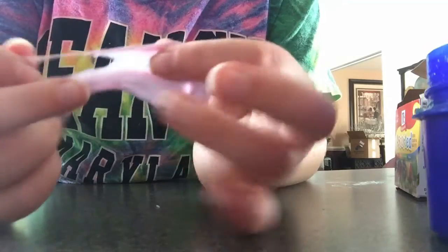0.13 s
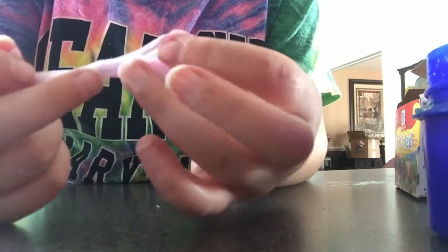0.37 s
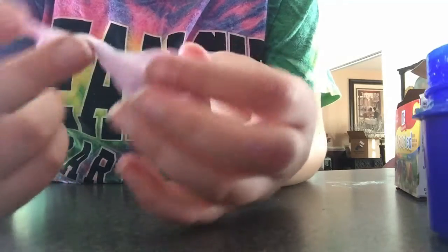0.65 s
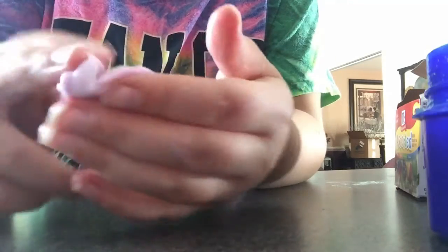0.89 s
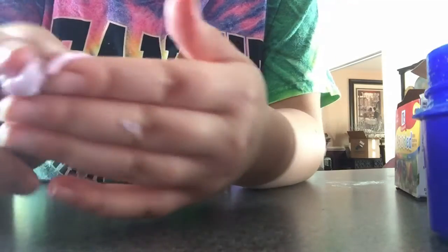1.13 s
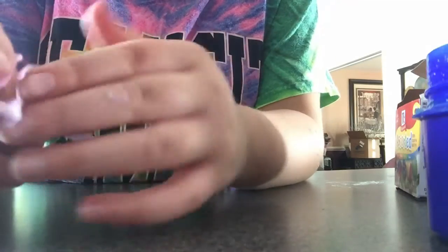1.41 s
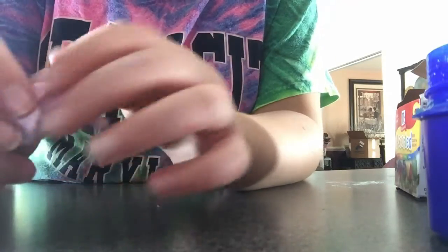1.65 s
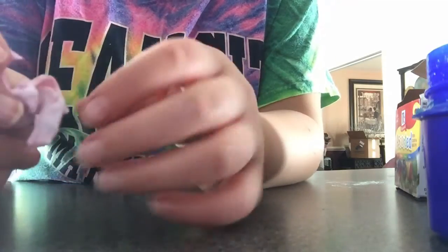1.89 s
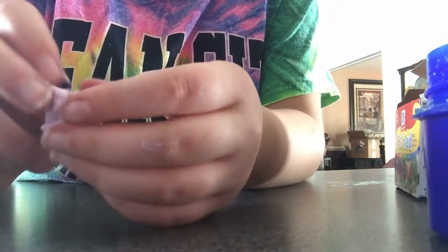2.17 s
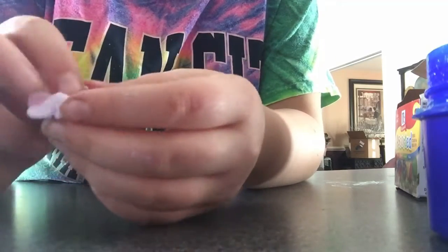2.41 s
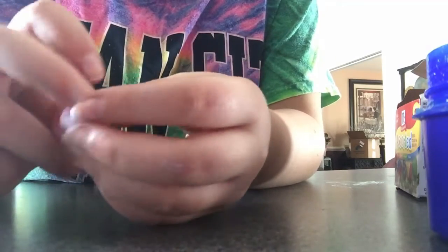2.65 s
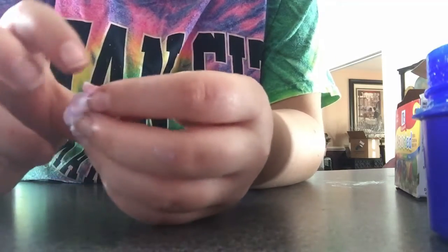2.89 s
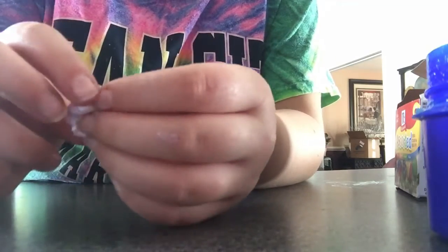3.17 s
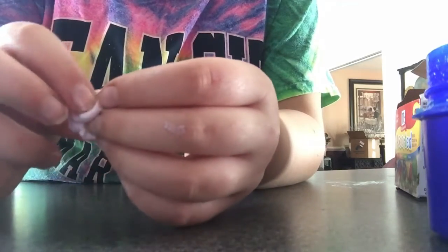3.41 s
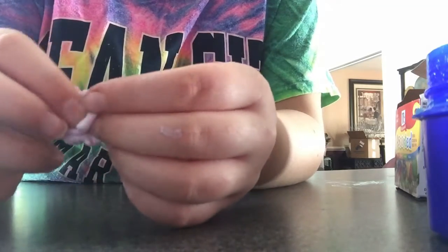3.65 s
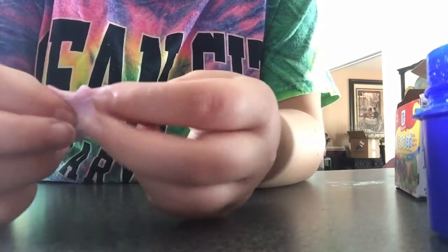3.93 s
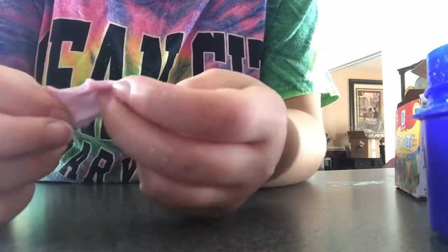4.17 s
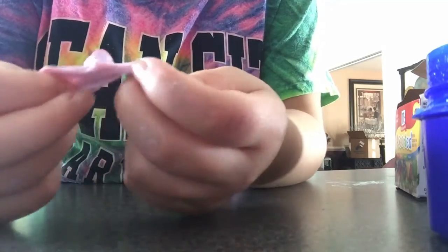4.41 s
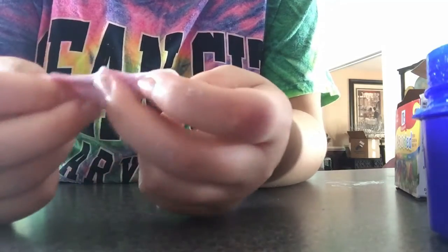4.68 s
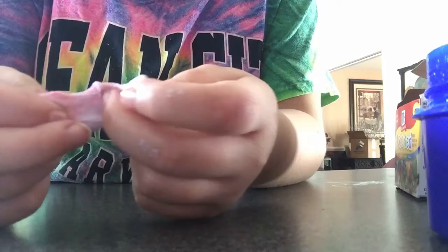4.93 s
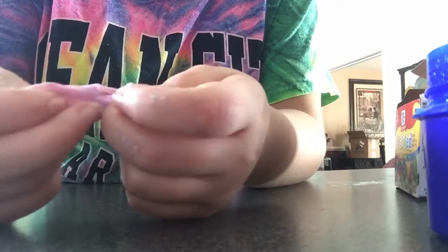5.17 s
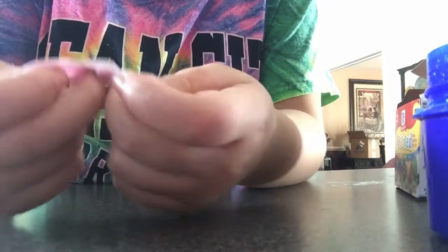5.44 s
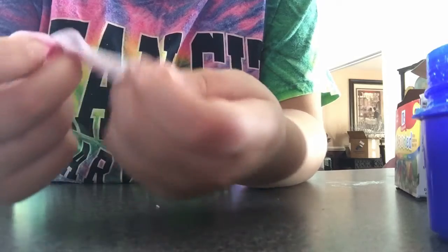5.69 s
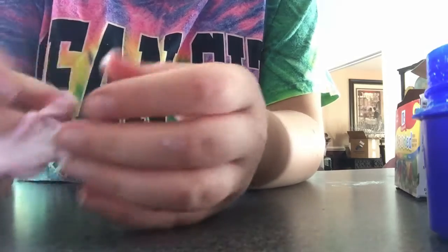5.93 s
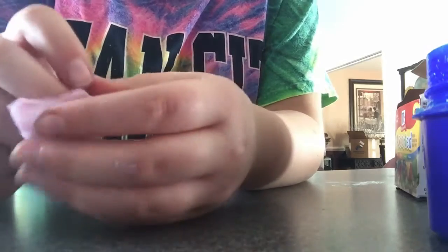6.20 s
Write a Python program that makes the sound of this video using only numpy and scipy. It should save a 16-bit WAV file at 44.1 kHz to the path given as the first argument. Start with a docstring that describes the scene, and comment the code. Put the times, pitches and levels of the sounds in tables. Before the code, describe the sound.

Close to a phone microphone in a kitchen, a bare forearm drags over the counter with a loud, grainy hiss, ending in a sharp skin slap and dull wrist knock. Then it goes quiet: fingers knead sticky slime with faint crackle, small wet smacks and high ticks. A softer slide with light bumps comes midway, then more sticky clicks and squishes over a low room hum.

```python
"""On a kitchen counter, with the phone's microphone just beyond a blob of sticky slime, the room hums low throughout.
A bare forearm slides on the counter with a broad hiss, near 1.6 s skin slaps and the wrist bumps the slab;
then kneading fingers draw faint crackle, ticks and smacks, the arm slides again from 4.2 s, and more wet contacts follow.
Grainy noise makes the slides and crackle, ringing modes the bumps, snaps, rings and fizz the smacks and ticks;
the phone's noise suppressor darkens the treble whenever little goes on."""
import sys
import numpy as np
from scipy import signal
from scipy.fft import rfft, irfft, next_fast_len
from scipy.io import wavfile
from scipy.ndimage import uniform_filter1d, map_coordinates

SR = 44100
rng = np.random.default_rng(int(sys.argv[2]) if len(sys.argv) > 2 else 0)


def attenuation_scalar(level_db):
    """Turn a level in dB into a linear amplitude multiplier (20 dB per decade)."""
    decades = np.asarray(level_db, float) / 20
    return 10 ** decades


def master_out(mix):
    """Clip the mix to full scale and print it as 16-bit PCM to the path in sys.argv[1]."""
    frames = np.transpose(np.atleast_2d(mix))
    ceiling = np.clip(frames, -1, 1)
    pcm = np.round(ceiling * 32767).astype(np.int16)
    wavfile.write(sys.argv[1], SR, pcm)


N = 278660  # samples

# forearm sliding on the counter, one curve a stroke: (time [s], level [dB])
SLIDE_STROKES = [
    [(0.0, -34.5), (0.05, -36), (0.13, -43.5), (0.39, -40), (0.51, -49.5)],
    [(0.51, -50), (0.55, -34), (0.6, -32), (0.84, -34.5), (0.92, -39), (1.03, -33), (1.18, -37),
     (1.22, -33.5), (1.57, -39), (1.64, -29.5), (1.68, -36.5), (1.86, -37.5), (2.03, -43.5), (2.17, -67.5)],
    [(4.22, -64.5), (4.364, -50.5), (4.638, -43), (4.776, -49), (4.828, -39), (4.998, -51.5), (5.17, -54.5),
     (5.214, -64.5), (5.3, -64)],
]
# colour of the skin's hiss in the air: (frequency [Hz], level per Hz [dB])
SKIN_COLOUR = [(530, -41), (900, -22), (1090, -10), (1420, 0.5), (1620, -4.5), (1780, -2), (2230, -5.5),
               (2480, -8.5), (3810, -4), (5140, -6), (5590, -9.5), (8280, -6.5), (10300, -12.5),
               (12100, -9.5), (15600, -13.5)]
# colour of the rumble through the slab: (frequency [Hz], level per Hz [dB])
SLAB_COLOUR = [(65, -55.5), (110, -18.5), (150, -8), (242, -2.5), (305, -5), (367, -3), (436, -5.5),
               (519, -4.5), (600, 1), (741, -8), (1100, -12.5), (1430, -27.5), (2420, -120)]
# how hard the arm leans, one value a stroke: (rumble over hiss [dB])
STROKE_LEAN = [-9.5, -7.5, -7]
# colour of the room noise: (frequency [Hz], level per Hz [dB])
ROOM_COLOUR = [(30, -31), (60, -20), (100, -21.5), (180, -15.5), (270, -14.5), (420, -23), (700, -25.5),
               (800, -34.5), (1400, -35), (2000, -43.5), (3000, -53.5), (13300, -58.5), (14000, -63),
               (20000, -74)]
# level of the upper room noise as the phone's suppressor adapts: (time [s], level [dB])
UPPER_ROOM_LEVEL = [(2.1, -60.5), (2.92, -63.5), (3.13, -60.5), (4.05, -67), (4.27, -62), (5.4, -62.5),
                    (6.08, -62), (6.32, -67)]
# narrow drone of an appliance: (frequency [Hz], width [Hz], level [dB])
APPLIANCE_DRONE = (286, 52, -59)
# wet smacks, and the slap of skin, low: (time [s], level [dB], centre [Hz], length [s], relative snap level [dB])
SMACK_CONTACTS = [(1.627, -27.5, 1295, 0.013, 1.5), (1.654, -30.5, 1500, 0.0092, -17),
                  (2.622, -50, 2180, 0.037, -8), (2.6355, -48.5, 1520, 0.034, -10),
                  (2.6876, -46, 2050, 0.029, -7), (2.712, -58.5, 3900, 0.09, -8.5),
                  (2.912, -56, 3470, 0.025, -1), (2.965, -41.5, 1210, 0.028, -7.5),
                  (2.9776, -41, 750, 0.033, -2), (3.03, -38, 1340, .028, -5),
                  (3.052, -40.5, 1140, .035, 2.5), (3.1, -59, 3800, .02, -8),
                  (3.312, -51.5, 1580, .015, -2.5), (3.635, -53, 2820, 0.038, -3),
                  (3.75, -62.5, 3170, 0.038, -5.5), (5.7856, -55, 1920, 0.026, -8),
                  (5.816, -52.5, 1710, 0.041, -10), (5.936, -58, 2860, 0.012, -4),
                  (6.003, -54, 2060, 0.063, -13.5), (6.046, -53, 3290, 0.018, -18),
                  (6.085, -52.5, 2090, 0.0098, -3.5)]
# wrist bumps on the counter: (time [s], level [dB], length of the push [s])
WRIST_BUMPS = [(1.635, -16.5, 0.0028), (1.644, -18.5, 0.0073), (1.659, -27, 0.0023), (1.671, -24.5, 0.0023),
               (4.461, -42, 0.0031), (4.821, -42, 0.0034), (5.837, -37.5, 0.006), (5.855, -35.5, 0.00096),
               (5.941, -36.5, 0.0018)]
# ringing modes of the counter slab: (frequency [Hz], relative level [dB], t60 [s])
COUNTER_MODES = [(138, -12, .15), (204, 0.5, 0.075), (252, -2.5, 0.088), (302.3, -1.5, 0.11),
                 (337, -11, 0.17), (498, -11.5, 0.062), (608, -6.5, 0.085), (672, 1, 0.027),
                 (1340, -11.5, 0.031)]
# each squeeze starts a faint crackle that fades: (time [s], level [dB], fade [dB/s])
SLIME_SQUEEZES = [(2.1, -55, 79), (2.2, -56.5, 27), (2.264, -57.5, 67), (2.354, -59, 97), (2.42, -63, 89),
                  (2.61, -65.5, 98), (2.696, -71, 113), (3.29, -63.5, 120), (5.17, -62.5, 13),
                  (5.348, -56.5, 250), (5.421, -57.5, 95), (5.576, -59.5, 73), (5.67, -64.5, 50),
                  (5.838, -58.5, 30), (5.94, -61, 70), (6.06, -59.5, 150), (6.2, -69.5, 50)]
# colour of the crackle: (frequency [Hz], level per Hz [dB])
CRACKLE_COLOUR = [(1350, -5), (2300, -5), (2570, -12), (3540, -8), (6260, -13.5), (7890, -11), (10400, -13),
                  (12400, -16), (15600, -16)]
# sticky threads letting go, high: (time [s], level [dB], centre [Hz], width [octaves], relative snap level [dB])
THREAD_TICKS = [(2.197, -54, 8800, 0.8, -5), (2.23, -62, 4600, .5, -8), (2.27, -55, 9050, .6, -6),
                (2.345, -56.5, 3630, 0.58, -6.5), (2.418, -52.5, 8200, 0.92, -2),
                (2.605, -54.5, 5140, 0.98, -6), (2.646, -55, 9100, 0.62, -6.5),
                (3.114, -56, 8430, 0.19, -8.5), (3.18, -64, 8000, .25, -9), (3.26, -54.5, 8760, 0.28, -7),
                (3.289, -50.5, 9450, 0.89, -4), (3.312, -51.5, 5520, 0.54, 4), (3.334, -51, 8400, .9, -5),
                (3.439, -68.5, 8500, .2, -6), (3.578, -61.5, 7900, 0.19, -9),
                (3.645, -62, 9360, 0.26, -2.5), (4.223, -62, 12200, 0.61, 1), (5.25, -64, 4000, 0.55, -8),
                (5.33, -52.5, 8260, 1.1, -4), (5.423, -60.5, 7450, 0.28, 4), (5.458, -52, 12200, 0.51, -7),
                (5.509, -58, 5530, 0.63, -6), (5.579, -52.5, 9500, 1.6, -4), (5.623, -61, 11000, 0.75, 10),
                (5.67, -58, 3800, .6, -8), (5.70, -53.5, 6530, 1.33, -10), (5.728, -59, 3800, 0.51, -3),
                (5.831, -57, 5250, 0.9, -7), (5.881, -55.5, 12500, 0.72, 2), (5.939, -49, 7050, 2.4, 2),
                (5.998, -58, 7900, 1.5, -5), (6.087, -57.5, 6200, 0.72, 3), (6.204, -60, 5540, 1.3, -4),
                (6.287, -60.5, 9000, 1.6, -3)]
# decay of the kitchen's answer: (frequency [Hz], t60 [s])
KITCHEN_DECAY = [(200, 0.18), (2000, 0.41), (10000, 0.076)]
# level under which the suppressor takes sound for noise: (frequency [Hz], level per Hz [dB])
NOISE_THRESHOLD = [(1200, -125), (2300, -103), (6000, -105), (15000, -108)]

LOW_CUT_HZ, TOP_HZ = 115, 15740
SMACK_OCTAVES, SMACK_REF_HZ, SMACK_NARROWS = 1.21, 1190, 0.83  # a higher smack fills fewer octaves
TICK_S = 0.038  # length of a tick's fizz
SQUEEZE_RISE_DB_PER_S = 900


def unit(x):
    """x at rms 1."""
    return x / np.sqrt(np.mean(x ** 2) + 1e-20)


def along(points, hz):
    """(frequency [Hz], value) points read on a log frequency axis."""
    f, value = np.transpose(points)
    return np.interp(np.log(hz + 1), np.log(f + 1), value)


def wobble(rate):
    """A smooth random curve, rate knots a second."""
    knots = rng.standard_normal(int(N * rate / SR) + 4)
    return map_coordinates(knots, [np.arange(N) * rate / SR])


def filtered(x, response):
    """x times a response of frequency."""
    m = next_fast_len(len(x) + 8192)
    return irfft(rfft(x, m) * response(np.fft.rfftfreq(m, 1 / SR)), m)[:len(x)]


def gritty(spectrum, grit_db):
    """Dense tiny slips of uneven size, coloured, rms 1."""
    unevenness = np.minimum(rng.exponential(size=N), 5)
    slips = rng.standard_normal(N) * attenuation_scalar(abs(grit_db) * unevenness)
    return unit(filtered(slips, lambda hz: attenuation_scalar(along(spectrum, hz))))


def strokes(tables, over_db):
    """Gain per sample along several strokes, each raised by its own dB, silent between them."""
    t, gain = np.arange(N) / SR, np.zeros(N)
    for rows, extra_db in zip(tables, over_db):
        gain += attenuation_scalar(extra_db + np.interp(t, *np.transpose(rows), -150, -150))
    return uniform_filter1d(gain, size=400)


def forearm():
    """Skin slips over the counter's grain: a hiss in the air and a rumble through the slab."""
    catch = wobble(14)  # the skin catches and lets go unevenly
    hiss_gain = strokes(SLIDE_STROKES, np.zeros(len(SLIDE_STROKES)))
    hiss_gain = hiss_gain * attenuation_scalar(0.48 * catch + 0.49 * wobble(70))
    rumble_gain = strokes(SLIDE_STROKES, STROKE_LEAN)
    rumble_gain = rumble_gain * attenuation_scalar(1.4 * catch + 0.68 * wobble(25))
    hiss = hiss_gain * gritty(SKIN_COLOUR, grit_db=2.0)
    rumble = rumble_gain * gritty(SLAB_COLOUR, grit_db=3.0)
    return hiss + rumble


def room():
    """A low rush, its upper part at a level that follows the phone's suppressor adapting, and a wavering drone."""
    hz, width, drone_db = APPLIANCE_DRONE
    s, level = np.transpose(UPPER_ROOM_LEVEL)
    rush = gritty(ROOM_COLOUR, grit_db=0.0)
    upper = filtered(rush, lambda f: 1 / (1 + (380 / (f + 1)) ** 4))
    lower = attenuation_scalar(-62.5 + 1.2 * wobble(3.0)) * unit(rush - upper)
    upper_gain = attenuation_scalar(np.interp(np.arange(N) / SR, s, level))
    drone = filtered(rng.standard_normal(N), lambda f: 1 / (1 + ((f - hz) / width * 2) ** 2))
    return lower + upper_gain * unit(upper) + attenuation_scalar(drone_db) * unit(drone)


def pops(events, lead, squareness, cycles, ring_db, ragged_db, count):
    """A contact parts: a snap within a short burst of fizz, while air pockets ring briefly."""
    out, t = np.zeros(N + SR), np.arange(SR // 4) / SR - 0.03  # the snap is at t = 0
    after = np.maximum(t, 0)
    for s, db, hz, length, octaves, snap_db in events:
        # air pockets, one a row; later ones are weaker
        late = rng.exponential(size=(count, 1))
        pitch, size = rng.standard_normal((2, count, 1))
        pocket_hz = np.clip(hz * 2 ** (0.6 * octaves * pitch), 200, TOP_HZ)
        u = np.maximum(t - 0.52 * length * late, 0)
        decay = attenuation_scalar(ring_db + 3 * size - 6 * late - 60 * u * pocket_hz / cycles)
        rings = decay * np.sin(2 * np.pi * pocket_hz * u) * (1 - np.exp(-u * pocket_hz / 2))

        snap = attenuation_scalar(snap_db - 60 * after * hz * octaves / 9)  # a wide band rings short
        snap = snap * np.sin(2 * np.pi * hz * after) * (1 - np.exp(-2 * after * hz))

        burst = np.where(t < 0, np.exp(-(t / lead) ** 2), np.exp(-(np.abs(t) / length) ** squareness))
        spits = attenuation_scalar(ragged_db * np.repeat(rng.standard_normal(len(t) // 100 + 1), 100)[:len(t)])
        colour = ragged_db * rng.standard_normal(100)  # every contact has its own uneven colour

        def band(f):
            """A bell in octaves, roughened every 220 Hz."""
            bell = np.exp(-(np.log2((f + 1) / hz) / octaves) ** 2)
            return bell * attenuation_scalar(np.interp(f, np.arange(100) * 220, colour))

        fizz = filtered(rng.standard_normal(len(t)) * burst * spits, band)
        fizz = fizz / np.abs(fizz).max()
        start = round((s + t[0]) * SR)
        out[start:start + len(t)] += attenuation_scalar(db) * (5.3 * snap + 2.4 * rings.sum(0) + 0.98 * fizz)
    return out[:N]


def smacks():
    """Skin slaps and wet slime parts: low wide snaps and short fizz among quickly damped air pockets."""
    events = []
    for s, db, hz, length, snap_db in SMACK_CONTACTS:
        octaves = SMACK_OCTAVES * (SMACK_REF_HZ / hz) ** SMACK_NARROWS
        events.append((s, db, hz, length, octaves, snap_db))
    return pops(events, lead=0.005, squareness=1.5, cycles=18, ring_db=-10, ragged_db=3.5, count=24)


def bumps():
    """Each soft push rings the slab's modes at new strengths."""
    out, t = np.zeros(N + SR), np.arange(SR // 2) / SR
    for s, db, push in WRIST_BUMPS:
        ring = np.zeros(len(t))
        for hz, level, t60 in COUNTER_MODES:
            decay = attenuation_scalar(level + rng.normal(0, 1.0) - 60 * t / t60)
            ring += decay * np.sin(2 * np.pi * hz * t)
        ring = ring * (1 - np.exp(-t / abs(push)))
        out[round(s * SR):][:len(t)] += attenuation_scalar(db) * ring / np.abs(ring).max()
    return out[:N]


def squeezing():
    """Crackle gain: the newest squeeze rises fast and fades until the next takes over."""
    s, db, fade = np.transpose(SLIME_SQUEEZES)
    t = np.arange(N) / SR
    last = np.searchsorted(s, t) - 1
    fading = np.where(last < 0, -150, db[last] - fade[last] * (t - s[last]))
    coming = np.minimum(last + 1, len(s) - 1)
    rising = db[coming] - SQUEEZE_RISE_DB_PER_S * np.abs(s[coming] - t)
    return uniform_filter1d(attenuation_scalar(np.maximum(fading, rising)), size=400)


def crackle():
    """Squeezed slime slips in dense grains, a faint crackle, its patches partly left by the phone's processing."""
    z = signal.stft(gritty(CRACKLE_COLOUR, grit_db=4.0), nperseg=512)[2]
    patches = uniform_filter1d(rng.standard_normal(z.shape), 9, 0)  # random, smoothed across frequency
    patches = uniform_filter1d(patches, 6, 1)  # and across time
    grains = signal.istft(z * attenuation_scalar(2.1 * unit(patches)), nperseg=512)[1][:N]
    return squeezing() * unit(grains)


def ticks():
    """Sticky threads let go: short high fizz over ringing pockets."""
    events = [(s, db, hz, TICK_S, octaves, snap_db) for s, db, hz, octaves, snap_db in THREAD_TICKS]
    return pops(events, lead=0.012, squareness=3.4, cycles=67, ring_db=-12.5, ragged_db=5.0, count=20)


def kitchen(x):
    """Each frequency of the room's answer dies at its own speed."""
    hz, t, z = signal.stft(rng.standard_normal(SR // 2), SR, nperseg=256)
    decay = attenuation_scalar(-60 * t / along(KITCHEN_DECAY, hz)[:, None])
    tail = signal.istft(z * decay, SR, nperseg=256)[1]
    delayed = np.pad(tail, (300, 0))  # samples before the answer starts
    return signal.fftconvolve(x, delayed / np.linalg.norm(tail))[:N]


def scene():
    """One microphone feeds both channels; slime and bumps also stir the kitchen."""
    near = smacks() + bumps() + crackle() + ticks()
    mix = forearm() + room() + near + attenuation_scalar(-9.5) * kitchen(near)
    return np.tile(mix, (2, 1))


def suppress(x, depth_db):
    """Narrow bands whose recent level is near the noise threshold are turned down, which leaves thin streaks."""
    hz, _, z = signal.stft(x, SR, nperseg=512, scaling="psd")
    power = np.abs(uniform_filter1d(2 * np.abs(z) ** 2, size=4, axis=1))
    noise_power = attenuation_scalar(2 * along(NOISE_THRESHOLD, hz))[:, None]
    share = power / (power + noise_power)
    gain = np.maximum(share ** 3.84, attenuation_scalar(depth_db))
    return signal.istft(z * gain, SR, nperseg=512, scaling="psd")[1][:N]


def top_cut(x):
    """Nothing passes above the cut-off."""
    return signal.sosfilt(signal.butter(12, 15740, fs=SR, output="sos"), x)


def record(dry):
    """The phone's microphone path: low cut and band limit, then the noise suppressor."""
    def response(hz):
        """Steep low cut with a floor, nothing from TOP_HZ up."""
        low_cut = 1 / (1 + (LOW_CUT_HZ / (hz + 1)) ** 8)
        return (hz < TOP_HZ) * np.maximum(low_cut, 0.08)

    band = filtered(dry[0], response)
    mix = np.tile(suppress(band, depth_db=-13.5), (2, 1))
    return top_cut(mix)


dry = scene()
out = record(dry)
master_out(out)
```